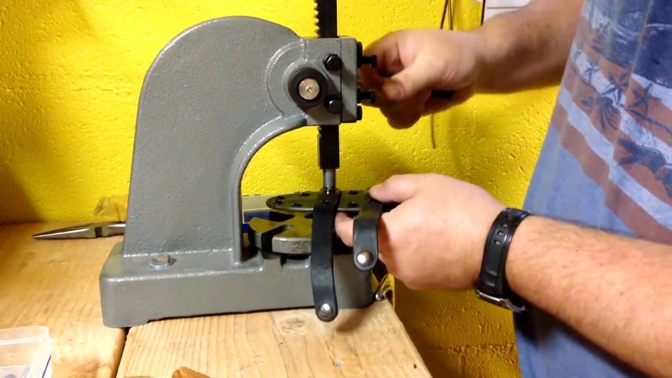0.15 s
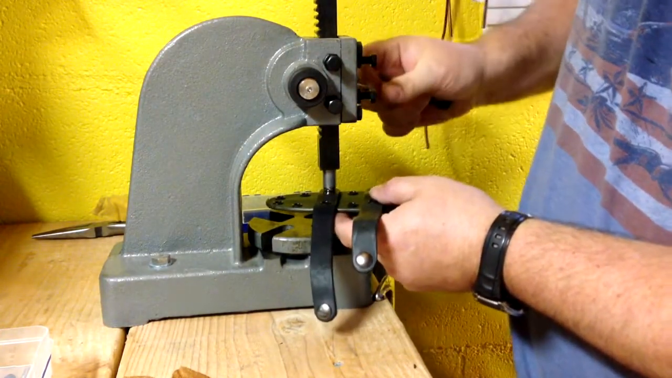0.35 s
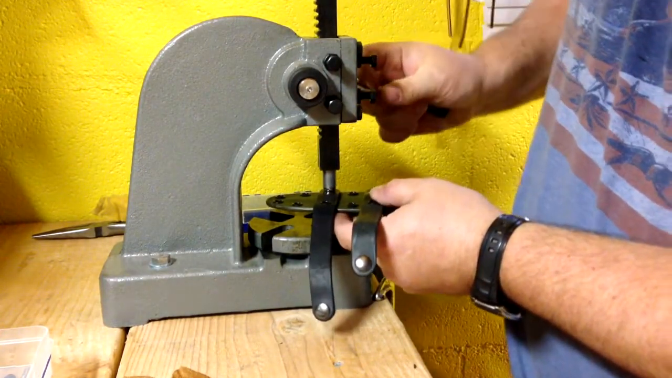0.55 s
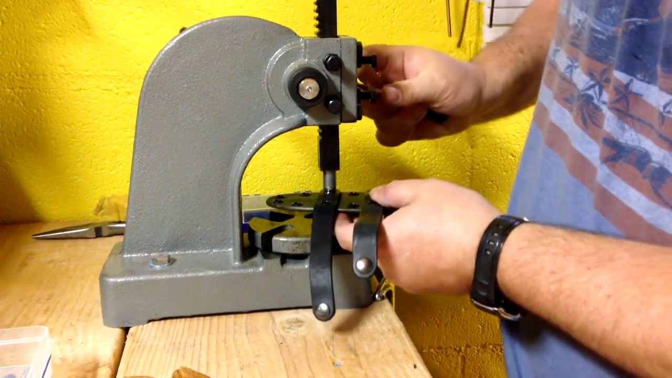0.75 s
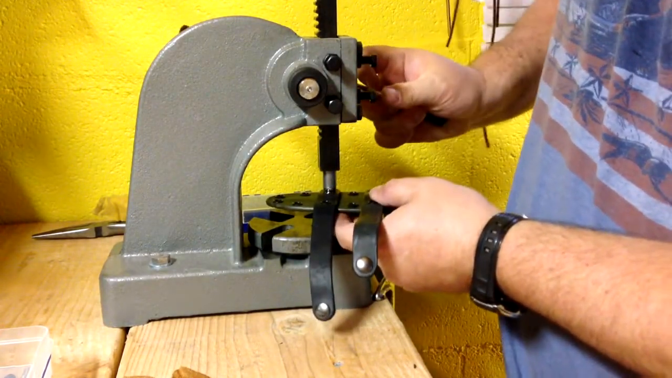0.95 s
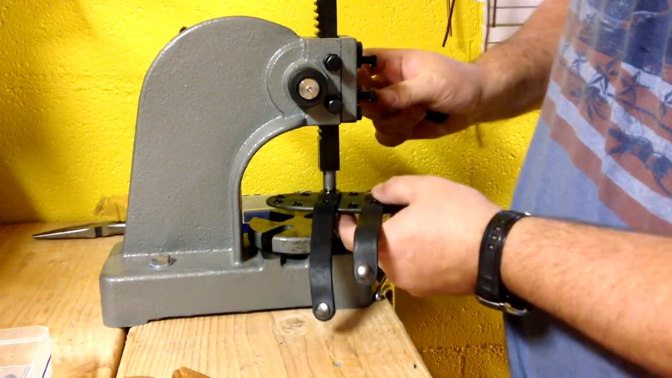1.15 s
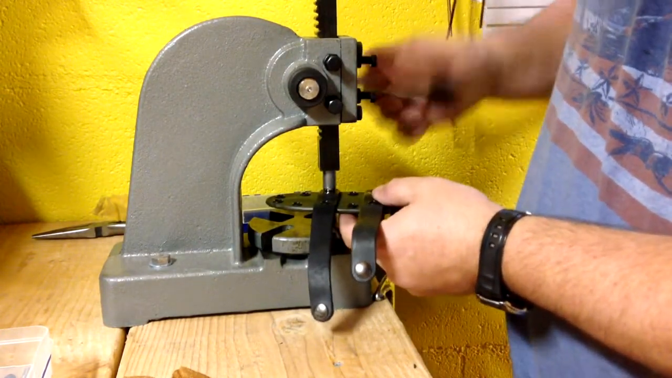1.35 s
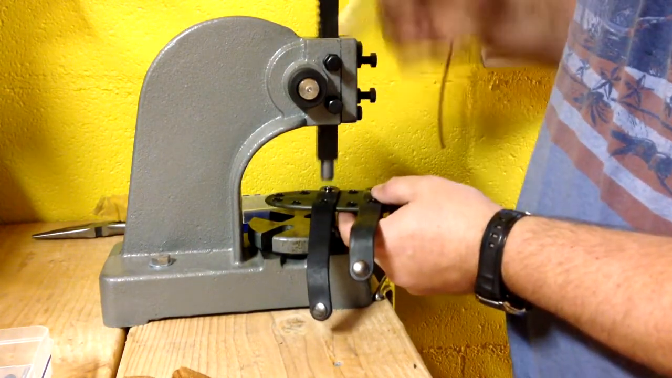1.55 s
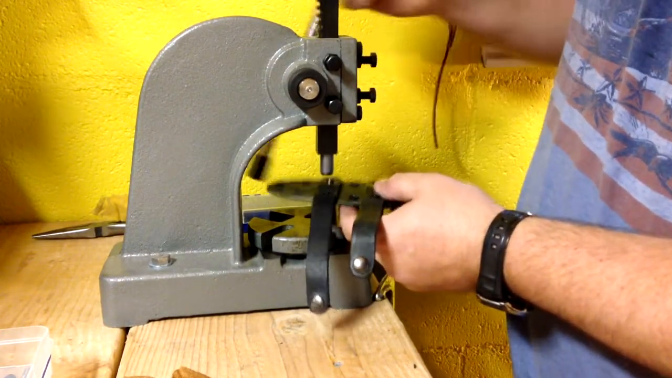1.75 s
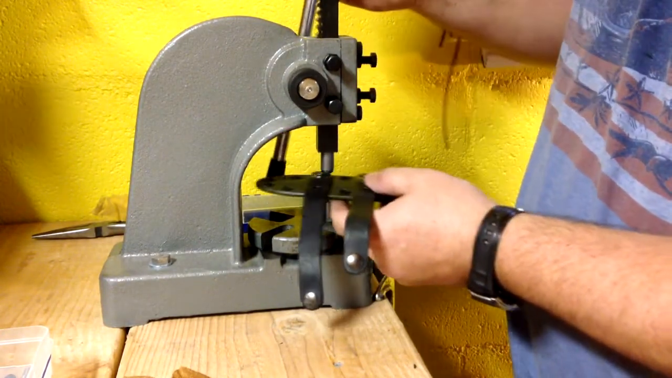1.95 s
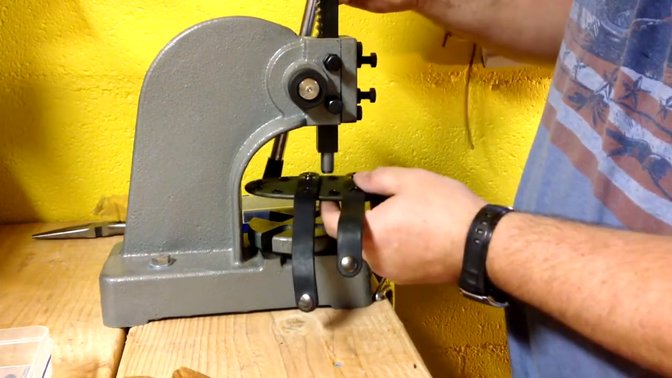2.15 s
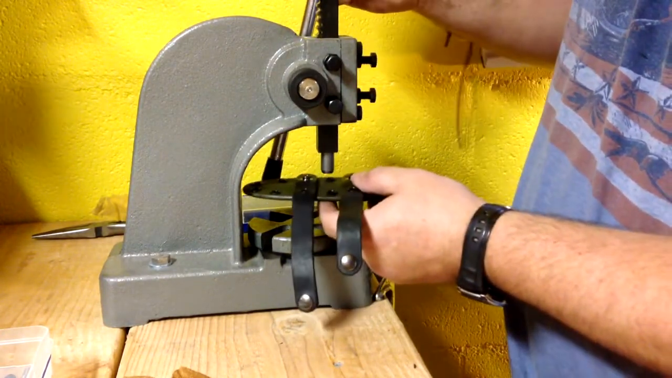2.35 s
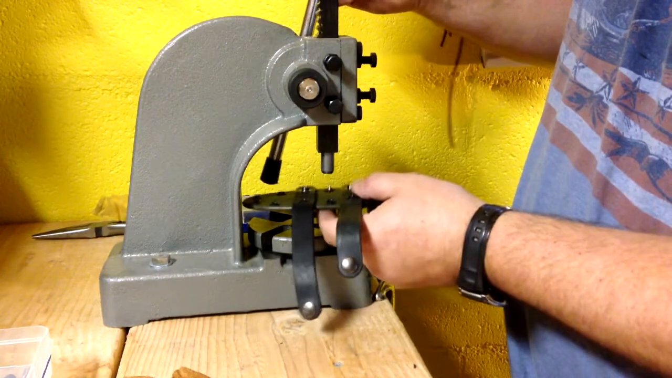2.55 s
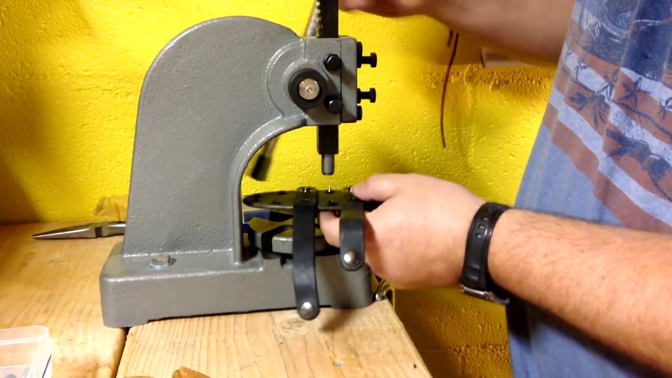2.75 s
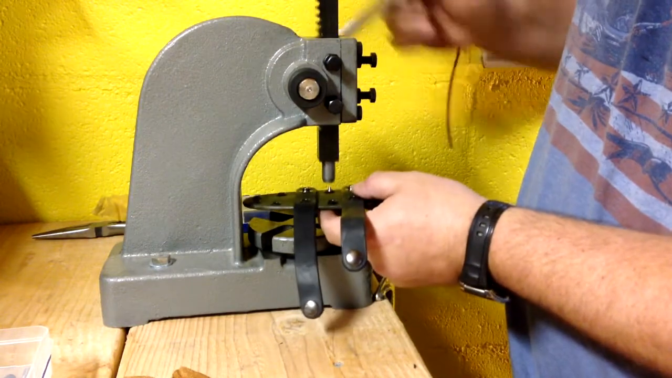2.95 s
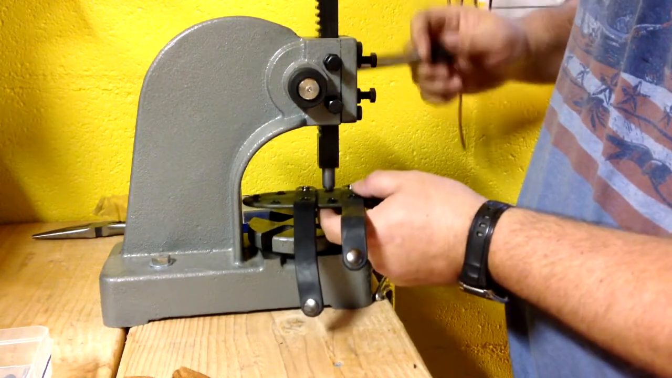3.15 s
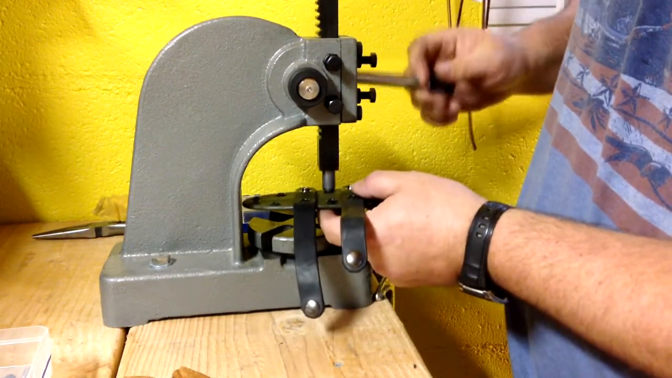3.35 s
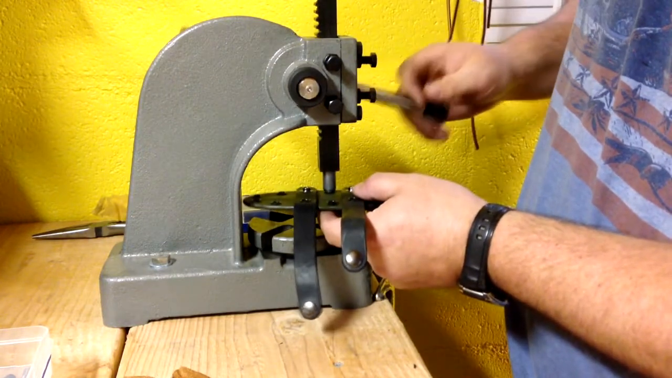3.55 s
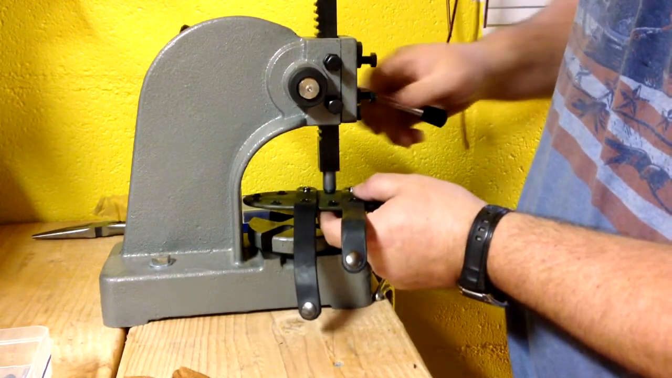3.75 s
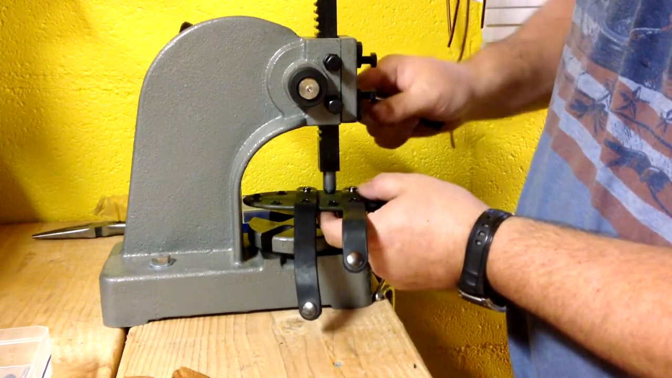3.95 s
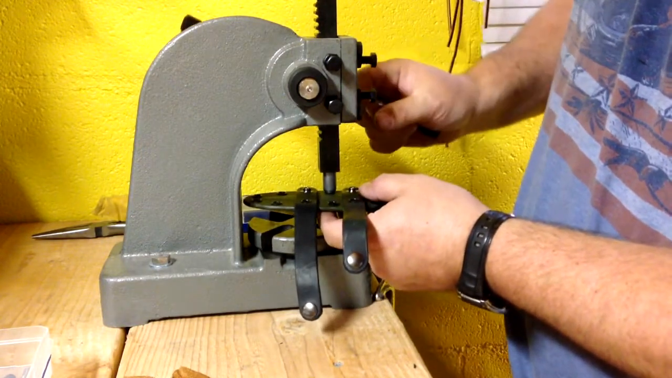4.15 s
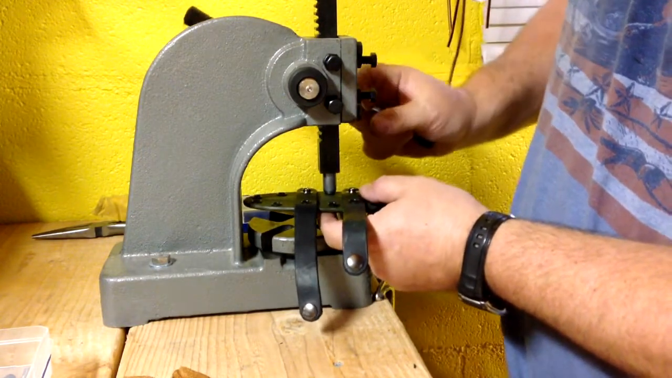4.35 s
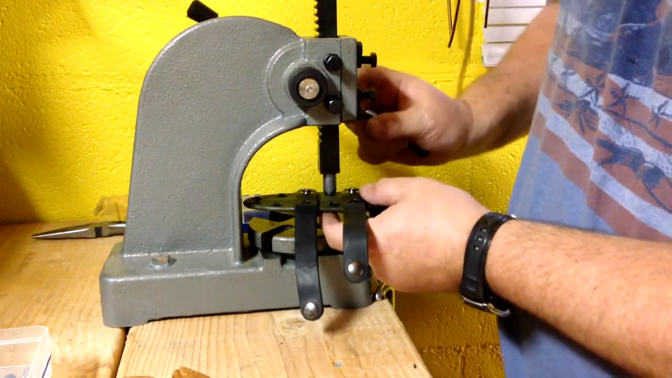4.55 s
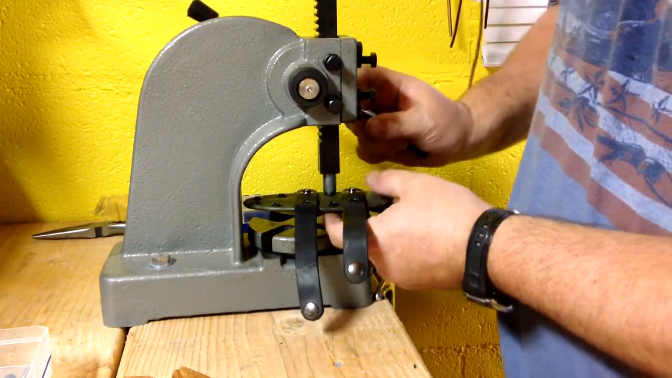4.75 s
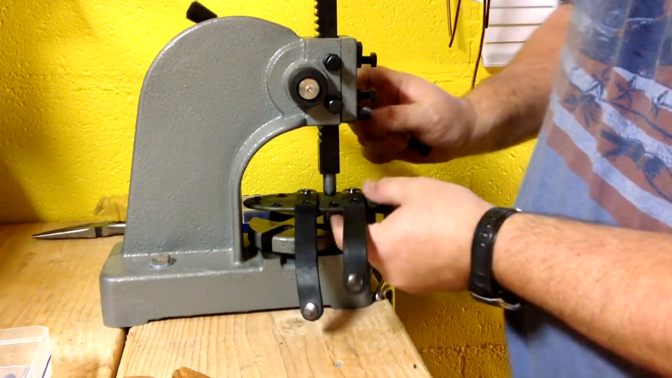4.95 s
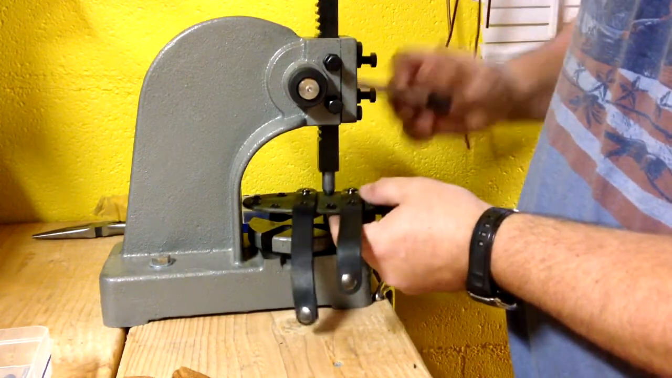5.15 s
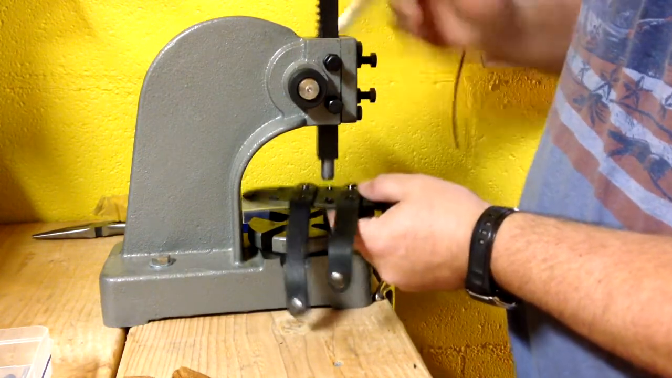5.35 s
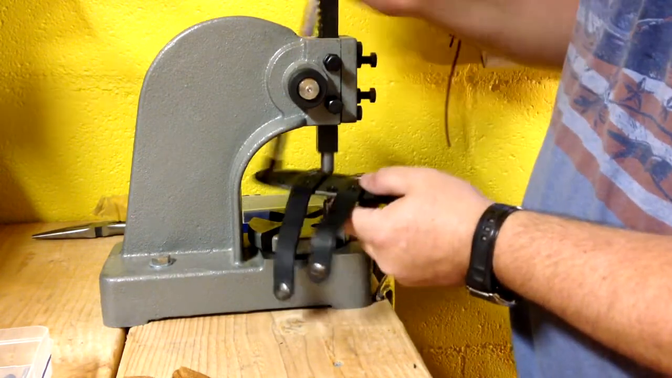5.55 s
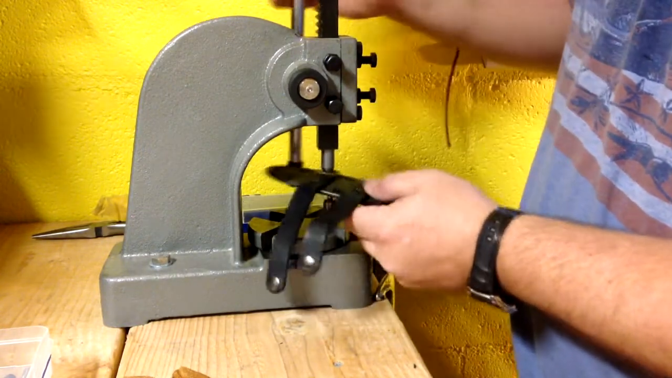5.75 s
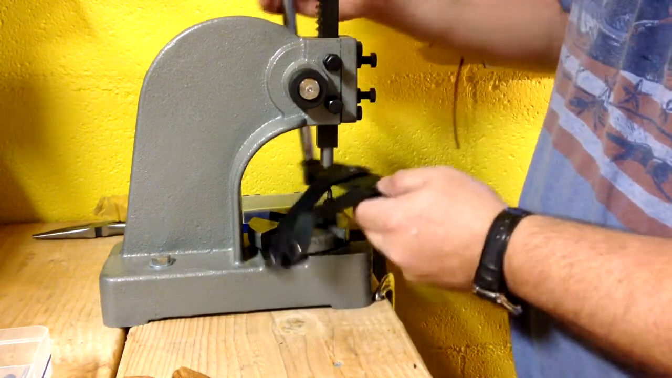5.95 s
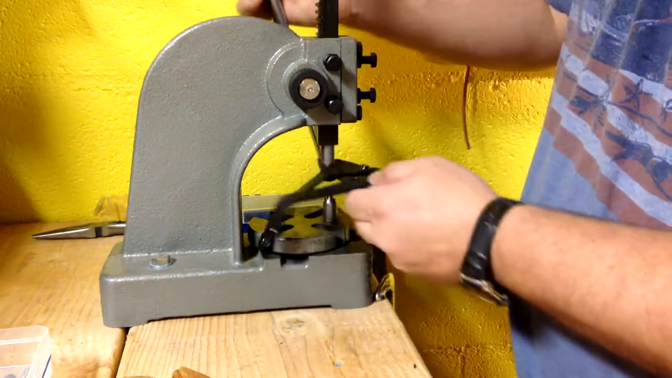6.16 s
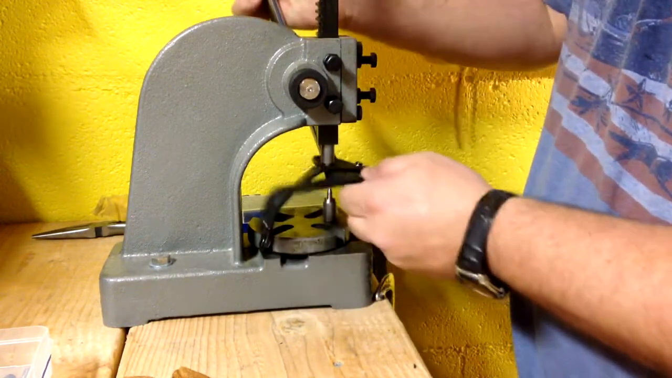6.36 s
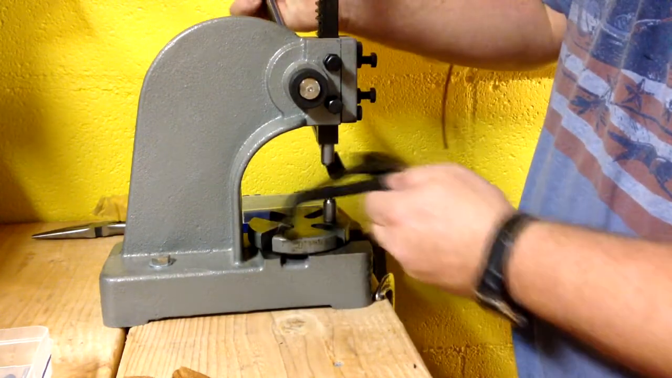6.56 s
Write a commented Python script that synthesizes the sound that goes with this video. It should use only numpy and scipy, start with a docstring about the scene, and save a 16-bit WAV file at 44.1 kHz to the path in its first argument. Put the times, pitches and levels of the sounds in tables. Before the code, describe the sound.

Close to the microphone in a quiet workshop, a metal hand press thuds through a wooden bench and its loose handle clinks in two short rattling bursts, about four seconds apart. Between them come lighter knocks, a sharp click, small scrapes and one faint squeak as a stiff sheath shifts on steel. After the second burst a rivet pulls loose with a short jerky creak, followed by a few light ticks and scrapes.

```python
"""A hand lever press on a wooden bench lets go of two rivets, close by in a quiet workshop.
Its toothed bar (the rack) and its ram knock through the cast frame into the bench, and the loose
steel handle clinks. A stiff sheath clicks, scrapes and squeaks on the die, the steel block under it,
and a rivet creaks free in jerks. Working hands make the bench murmur; the microphone hisses softly."""
import sys
import numpy as np
from scipy import signal
from scipy.fft import rfft, irfft
from scipy.io import wavfile
from scipy.ndimage import uniform_filter1d

SR = 44100
rng = np.random.default_rng(int(sys.argv[2]) if len(sys.argv) > 2 else 0)


def master_out(mix):
    """Clip the mix to full scale and print it as 16-bit PCM to the path in sys.argv[1]."""
    frames = np.transpose(np.atleast_2d(mix))
    ceiling = np.clip(frames, -1, 1)
    pcm = np.round(ceiling * 32767).astype(np.int16)
    wavfile.write(sys.argv[1], SR, pcm)


N = 291060

# Below, t is when, f is pitch, and fade is the time a sound takes to drop by 60 dB.
# A "colour" lists how strong each pitch is in a noise; "tones" are the notes a struck part rings with.
# microphone hiss: f/Hz, level/dB
HISS_COLOUR = [(15, -37), (25, -10), (70, 3.5), (153, -7), (301, -10), (335, -14), (364, -9.5), (451, -26),
               (489, -26), (659, -17), (715, -16), (841, -23.5), (3250, -15.5), (14800, -20.5),
               (16000, -53)]
# bouts of hands and rack working the bench: t/s of the strongest moment, level/dB, fall/(dB per s)
BOUTS = [(0.42, -70.5, 29), (1.32, -69, 38), (1.49, -46.5, 53), (3.0, -57, 49), (3.62, -74, 15),
         (4.37, -68.5, 41), (5.22, -44.5, 62), (5.4, -55, 44), (5.66, -56, 41), (5.989, -60, 82),
         (6.6, -66, 52)]
# bench under the hands: f/Hz, level/dB
MURMUR_COLOUR = [(50, -20), (120, 4), (300, -4), (700, -12), (1100, -20.5), (3000, -47)]
# blows: t/s, bench level/dB, favoured bench f/Hz, frame/dB and hard edge/dB (both added to the level)
BLOWS = [(0.004, -47, 186, -22, -24), (0.159, -47, 98, -35, -35), (0.2, -57.5, 150, -22, -30),
         (0.224, -64.5, 191, -27, -30), (0.35, -57, 480, -14, -22), (0.364, -47.5, 398, -15, -21.5),
         (0.389, -58.5, 422, -21, -31), (1.298, -51.5, 200, -17, -43), (1.331, -48, 416, -18, -33),
         (1.345, -32.5, 363, -9.5, -26.5), (1.427, -32, 431, 5, -13.5), (1.439, -37.5, 205, -20, -12.5),
         (1.486, -30, 301, -9, -7), (1.504, -33, 288, -11, -24), (1.519, -45, 301, -30, -20),
         (1.573, -33.5, 447, -7.5, -8), (1.602, -37, 383, 0, -15), (1.653, -41.5, 296, -0.5, -16.5),
         (1.684, -48.5, 198, -9, -18), (1.719, -40.5, 452, 2.5, -6), (1.798, -44.5, 282, -13, -34),
         (1.84, -51, 206, -23, -27), (2.821, -56.5, 277, -6, -24), (2.836, -39.5, 310, 2.5, -16),
         (3.003, -41, 280, -4, -19), (3.128, -63, 199, -16, -8), (3.182, -55, 151, -4.5, -20),
         (3.408, -60, 96.9, -26, -29), (3.456, -43.5, 193, -11.5, -32), (3.503, -47.5, 203, -41, -40),
         (3.618, -42, 296, -21, -30), (3.63, -37.5, 460, 2, -12), (3.654, -45, 194, -15, -31),
         (3.92, -48, 208, -5.5, -26), (4.175, -52, 194, -17, -31), (4.363, -46.5, 275, -12, -40),
         (4.377, -43.5, 415, -11.5, -32), (4.499, -59, 246, -26.5, -20), (5.048, -44, 215, -13.5, -45),
         (5.087, -40, 394, -8.5, -31), (5.169, -31, 198, 2.5, -9.5), (5.199, -26.5, 290, -9.5, -9),
         (5.224, -50, 468, 2, -13), (5.284, -37, 288, -2, -9), (5.298, -38.5, 288, 3, -14),
         (5.318, -31, 336, 3.5, -1.5), (5.349, -35, 450, -3, -2.5), (5.389, -35, 199, -3.5, -14.5),
         (5.492, -46, 471, 5, -8), (5.521, -40, 252, -3.5, -19), (5.627, -42.5, 433, -12, -2),
         (5.65, -38, 211, -12.5, -12), (5.698, -42.5, 435, -7, -10), (6.041, -54.5, 511, -2, -20)]
# bench top: f/Hz, level/dB, fade/s
BENCH_TONES = [(59.6, 1, 0.23), (117, 2.5, 0.11), (200.8, 1.5, 0.098), (283, -1, 0.096), (347, -3, 0.074),
               (430, -0.5, 0.087), (479, -7, 0.13)]
# cast frame: f/Hz, level/dB, fade/s
FRAME_TONES = [(556, -8.5, 0.17), (607, 1, 0.096), (706.3, 1.5, 0.12), (748.5, 0, 0.086), (813, -4, 0.065),
               (962, -3.5, 0.11), (1120, -7, 0.043), (1176, -15, 0.11)]
# rough wooden thud under each blow: f/Hz, level/dB
THUD_COLOUR = [(60, -26), (150, -11.5), (400, 1), (900, -7), (1400, -27), (4000, -59)]
# the frame's many small tones, blurred into a clatter: f/Hz, level/dB
CLATTER_COLOUR = [(700, 2.5), (1300, 8.5), (2300, 5.5), (3500, -4), (5500, -14), (9000, -26), (16000, -82)]
# how long that clatter lasts: f/Hz, fade/s
CLATTER_FADES = [(1000, 0.094), (2500, 0.16), (5000, 0.1), (9000, 0.019)]
# ram and die plate: f/Hz, level/dB, fade/s
PLATE_TONES = [(1507, 12, 0.069), (1650, -13, 0.027), (2030, -31, 0.027), (2050, -8, 0.033),
               (2227, -2, 0.075), (2330, 10, 0.048), (2653, -28.5, 0.074), (3220, -13, 0.036),
               (3930, 7, 0.014), (4700, -13, 0.042)]
# sheath and rivet snapping on the die: t/s, level/dB, centre f/Hz, rough treble/dB against the centre
SNAPS = [(1.0723, -62.5, 2700, -16), (1.767, -53, 2470, -30), (1.783, -52, 2950, -30),
         (1.8666, -32.5, 3400, -21.5), (1.9193, -54, 3700, -31), (2.837, -42, 1690, -44),
         (3.2635, -56, 2700, -22), (3.6311, -38.5, 2060, -31), (3.6905, -57.5, 2080, -5),
         (5.6285, -37, 2460, -25), (5.652, -35, 2620, -20), (5.699, -54, 3000, -32),
         (5.7932, -52.5, 2500, -40), (5.8332, -61, 2750, -3), (5.969, -48.5, 7980, -3),
         (5.978, -55, 6800, -3), (6.006, -55, 6600, -6), (6.074, -60, 7500, -3), (6.0453, -52.5, 1650, -14),
         (6.094, -53, 1630, -1), (6.106, -51.5, 6800, -16), (6.157, -60.5, 2270, -9),
         (6.4998, -60, 2280, -23), (6.573, -68, 2260, -20), (6.5882, -52.5, 3000, 0)]
# handle rattling in its hole: t/s, level/dB, boost of the upper tones/dB,
# singing/dB (added to the level), singing f/Hz (set by how far the handle has slid)
RATTLES = [(1.4591, -33, 0, -30, 4620), (1.4868, -44, 4, -16, 4620), (1.517, -58, -8, -14.0, 4600),
           (1.5743, -56.5, -5, -18, 4600), (5.188, -37.5, -6, -14.5, 4650), (5.1981, -42.5, -7, -15, 4650),
           (5.2945, -47, 11, -4, 4460), (5.3166, -51, -26, -6, 4500), (5.3502, -50, -28, -13, 4510)]
# the handle's quick tones: f/Hz, level/dB, fade/s
HANDLE_TONES = [(4000, -8, .03), (4317, -2, .03), (4700, 0, .035), (4980, -3, .03), (5276, -5, .03),
                (7550, -4, .022), (7750, -5, .025), (8100, -23, .07), (10300, -19, .02)]
# the handle's tones that sing on: multiple of the singing pitch, level/dB, fade/s
SINGING_TONES = [(1, 4, 0.31), (1.035, -7, 0.15)]
# rough crack of steel on steel: f/Hz, level/dB
CRACK_COLOUR = [(1500, 11), (3500, 0), (6000, -0.5), (8500, 1), (12000, -29), (16000, -37)]
# sheath dragged over steel: t/s, length/s, level/dB, fizz/dB and rub/dB (both added to the level)
DRAGS = [(1.757, 0.02, -59.5, -28, -10), (1.864, 0.018, -65, -12, -22), (1.923, 0.038, -67.5, -8, -15),
         (1.986, 0.032, -66.5, -12, -13), (2.545, 0.057, -71, 2.5, 5), (2.649, .025, -67, -9, -1.5),
         (3.663, 0.031, -73, 3.5, -20), (5.658, 0.026, -57.5, -9.5, -5), (5.837, 0.088, -61, -26, -1.5),
         (5.973, .012, -69.5, 10, -22), (6.074, .01, -79, 13, -20), (6.038, 0.0078, -67.5, 4, -20),
         (6.091, 0.021, -61, -1.5, -12), (6.478, .03, -65.5, -4, -9), (6.579, .03, -57, -5, -7.5)]
# the dragged sheath: f/Hz, width/Hz, level/dB
SHEATH_TONES = [(2000, 360, 4.5), (2400, 340, 6), (3024, 310, 6), (4200, 460, 0)]
# fizz of the finest slips: f/Hz, level/dB
FIZZ_COLOUR = [(2350, -26.5), (4000, -8.5), (6590, 6.5), (12600, -10), (14800, -8), (15600, 0.5),
               (16000, -48)]
# low rub in the frame: f/Hz, level/dB
RUB_COLOUR = [(200, -16), (450, 1.5), (1200, -6), (2000, -15), (16000, -70)]
# sheath catching on the die edge: t/s, length/s, level/dB
CATCH = (2.483, 0.042, -52)
# the squeaking sheath: f/Hz, width/Hz, level/dB
SQUEAK_TONES = [(1970, 330, -1.5), (3100, 430, -5.5), (4230, 870, -2.5), (5700, 940, -3), (7400, 1000, -5),
                (12000, 2500, -4)]
# the set rivet jerking free: t/s, level/dB
RIVET_JERKS = [(5.832, -49), (5.86, -53), (5.87, -49), (5.881, -41), (5.896, -41.5), (5.912, -43),
               (5.921, -44.5), (5.929, -50.5)]
# rivet and sheath together: f/Hz, level/dB, fade/s
RIVET_TONES = [(944, 8, 0.015), (1520, -4, 0.019), (2110, -4.5, 0.014), (2780, -3.5, 0.024),
               (3260, 2.5, 0.015), (5100, -10, 0.013)]
# workshop echo: f/Hz, fade/s
ROOM_FADES = [(100, 0.52), (500, 0.2), (2000, 0.34), (8000, 0.14)]


def amp(db):
    """Turns decibels into a factor to multiply by."""
    return 10 ** (np.asarray(db) / 20)


def evened(x):
    """Scales x to an average power of 1."""
    return x / np.sqrt(np.mean(x ** 2) + 1e-20)


def look_up(points, hz):
    """Reads between the rows of a table of pitches."""
    f, value = np.transpose(points)
    return np.interp(np.log(hz + 1), np.log(f + 1), value)


def add(mix, s, db, sound):
    """Places a sound at s seconds, with its strongest 3 ms at the level db."""
    top = np.sqrt(uniform_filter1d(sound ** 2, size=130).max())
    part = mix[max(round(s * SR), 0):][:len(sound)]
    part += amp(db) / top * sound[:len(part)]


def coloured(x, colour):
    """Makes each pitch in x as strong as the colour says."""
    gain = amp(look_up(colour, np.fft.rfftfreq(len(x), 1 / SR)))
    return evened(irfft(rfft(x) * gain, len(x)))


def noise(samples, colour):
    """Random noise with the given colour."""
    return coloured(rng.standard_normal(samples), colour)


def dying(x, fades):
    """Each pitch in x fades at its own speed, given as (f/Hz, fade/s)."""
    hz, t, bands = signal.stft(x, SR, nperseg=256)
    gain = amp(-60 * t / look_up(fades, hz)[:, None])
    return signal.istft(bands * gain, SR, nperseg=256)[1][:len(x)]


def rising(x, ms):
    """Softens the start: x builds up over about ms milliseconds."""
    return x * (1 - np.exp(-np.arange(len(x)) * 1000 / SR / max(ms, .02)))


def ring(tones, spread_db, detune, damping=1, boost_db=lambda f: 0):
    """Three close, fading waves to a tone; where the blow lands changes their sizes and signs."""
    hz, db, fade_s = np.transpose(np.repeat(tones, 3, axis=0))[:, :, None]
    chance = rng.standard_normal((3, len(hz), 1))
    t = np.arange(0, min(.7 * fade_s.max() / damping, .2), 1 / SR, dtype=np.float32)
    size = amp(db + boost_db(hz) + spread_db * chance[0]) * np.sign(chance[1])
    fade = np.exp(np.float32(-np.log(1000) * damping / fade_s) * t)
    waves = fade * np.sin(np.float32(2 * np.pi * hz * (1 + detune * chance[2])) * t)
    soft_end = np.minimum(4 - 4 * t / t[-1], 1)
    return (size[:, 0] @ waves) * soft_end


def grit(per_s, spread_db):
    """Tiny slips or bumps of uneven size, at random moments."""
    sizes = amp(spread_db * np.minimum(rng.exponential(1, N), 4))
    return sizes * (rng.random(N) < per_s / SR) * rng.choice([-1, 1], N)


def rubbed(slips, tones):
    """Every slip sets the tones ringing; wider tones die sooner."""
    t = np.arange(1000) / SR
    body = sum(amp(db) * np.exp(-np.pi * width * t) * np.sin(2 * np.pi * hz * t)
               for hz, width, db in tones)
    return evened(signal.oaconvolve(slips, rising(body, 0.27))[:N])


def stroke(start, length, db, rise, fall):
    """Loudness that climbs to db at start, holds for length and drops; rise and fall are in dB per s."""
    t = np.arange(N) / SR - start
    return amp(db - rise * np.maximum(-t, 0) - fall * np.maximum(t - length, 0))


def microphone_hiss():
    """The microphone's own steady, faint noise."""
    return amp(-68) * noise(N, HISS_COLOUR)


def bench_murmur():
    """Small random bumps keep the bench murmuring, louder while the hands work."""
    bump = rising(dying(noise(8192, MURMUR_COLOUR), [(100, 0.074), (800, 0.11)]), ms=1.9)
    at_rest = amp(-78)
    effort = at_rest + sum(stroke(s, 0, db, rise=153, fall=fall) for s, db, fall in BOUTS)
    return effort * evened(signal.oaconvolve(grit(per_s=300, spread_db=4), bump)[:N])


def press_knocks():
    """Each blow rings bench and frame and thuds; a harder edge brings more clatter and plate ring."""
    out = np.zeros(N)
    for s, db, hz, frame_db, edge_db in BLOWS:
        rise_ms = 1.06 - 0.02 * edge_db  # the softer the edge, the slower the blow builds
        # More damping makes the ringing die sooner. Three things add to it:
        seating = 0.01 * (db + 44.5)  # strong blows press the parts together
        into_frame = 0.04 * (frame_db + 13)  # blows that go mostly into the frame are drier
        palm = 1.5 * max(np.log2(190 / hz), 0)  # the deepest bumps are a palm, which stills the bench
        damping = max(1 + seating + into_frame + palm, .3)
        bench = ring(BENCH_TONES, spread_db=0.98, detune=0.034, damping=damping,
                     boost_db=lambda f: -7.5 * abs(np.log2(f / hz)))
        add(out, s, db, rising(bench, rise_ms))
        frame = ring(FRAME_TONES, spread_db=0.72, detune=0.026, damping=damping)
        add(out, s, db + frame_db, rising(frame, rise_ms))
        thud = dying(noise(8192, THUD_COLOUR), [(200, 0.28), (900, 0.17)])
        add(out, s, db - 13.5, rising(thud, 0.64 * rise_ms))
        clatter = dying(noise(8192, CLATTER_COLOUR), np.divide(CLATTER_FADES, [1, damping]))
        add(out, s, db + edge_db, rising(clatter, 0.097 * rise_ms))
        plate = ring(PLATE_TONES, spread_db=4.5, detune=0.016)
        add(out, s, db + edge_db - 4, rising(plate, 0.95 * rise_ms))
    return out


def sheath_clicks():
    """Sheath and rivet snap on the die: a quick burst of noise that leaves the plate ringing faintly."""
    out, t = np.zeros(N), np.arange(4096) / SR
    for s, db, hz, treble_db in SNAPS:
        fade_s = 0.043 * np.exp(-0.022 * (db + 55))  # louder snaps die sooner
        colour = [(hz / 8, -30), (hz / 2.55, -5), (hz, 0), (hz * 1.29, -2),
                  (11000, 1.05 * treble_db), (16000, 2 * treble_db - 1)]
        snap = noise(len(t), colour) * amp(-60 * t / fade_s)
        add(out, s, db, rising(snap, ms=0.042))
        plate = ring(PLATE_TONES, spread_db=9, detune=0.0099,
                     boost_db=lambda f: -8.5 * abs(np.log2(f / hz)))
        add(out, s, db - 24.5, plate)
    return out


def chatter(ms):
    """Parts do not meet cleanly: a first touch, then a short dying shudder."""
    t = np.arange(SR // 20) / SR
    force = 0.25 * rng.standard_normal(len(t)) * np.exp(-t * 1000 / ms)
    force[0] = 1
    return force


def handle_clinks():
    """Steel hits steel: quick bright tones, a wavering note that sings on, and a rough crack."""
    out = np.zeros(N)
    for s, db, upper_db, sing_db, sing_hz in RATTLES:
        bright = ring(HANDLE_TONES, spread_db=-5.5, detune=0.019,
                      boost_db=lambda f: upper_db * (f > 6500))
        add(out, s, db, signal.fftconvolve(chatter(ms=1), bright))
        song = ring(np.multiply(SINGING_TONES, [sing_hz, 1, 1]), spread_db=3.5, detune=0.006)
        # the loose handle touches and lets go, so the note flutters
        flutter_db = 4.5 * evened(uniform_filter1d(rng.standard_normal(len(song)), size=500))
        add(out, s, db + sing_db, song * amp(flutter_db))
        crack = dying(noise(4096, CRACK_COLOUR), [(3000, 0.16), (10000, 0.058)])
        add(out, s, db - 9.5, crack)
    return out


def sheath_scrapes():
    """Many tiny slips ring the sheath; finer ones fizz above, coarser ones rub in the frame."""
    rasp = rubbed(grit(per_s=1500, spread_db=-0.5), SHEATH_TONES)
    fizz = coloured(grit(per_s=2200, spread_db=4.5), FIZZ_COLOUR)
    rub = coloured(grit(per_s=700, spread_db=1.5), RUB_COLOUR)
    out = np.zeros(N)
    for s, length, db, fizz_db, rub_db in DRAGS:
        scrape = rasp + amp(fizz_db) * fizz + amp(rub_db) * rub
        out += stroke(s, length, db, rise=1500, fall=417) * scrape
    return out


def sheath_squeak():
    """The sheath catches on the die edge, and a rush of slips makes it squeak once."""
    squeak = rubbed(grit(per_s=2400, spread_db=1.5), SQUEAK_TONES)
    return stroke(*CATCH, rise=6000, fall=2500) * squeak


def rivet_creak():
    """The rivet comes free in jerks, each a short dull ring of rivet and sheath."""
    out = np.zeros(N)
    for s, db in RIVET_JERKS:
        jerk = ring(RIVET_TONES, spread_db=3, detune=0.04)
        add(out, s, db, rising(jerk, ms=0.08))
    return out


def room_echo(x):
    """The workshop sends back many scattered echoes; the highest pitches die first."""
    echoes = np.zeros(SR // 2)
    at = np.arange(200, len(echoes) - 20, 20)
    echoes[at + rng.integers(0, 20, len(at))] = rng.choice([-1., 1.], len(at))
    tail = dying(echoes, ROOM_FADES)
    return signal.fftconvolve(x, tail / np.linalg.norm(tail))[:N]


def scene():
    """Mixes the press, its echo, the murmur and the hiss into one channel."""
    press = press_knocks() + handle_clinks() + sheath_clicks() + rivet_creak()
    press += sheath_scrapes() + sheath_squeak()
    workshop = press + amp(-13) * room_echo(press) + bench_murmur()
    # the microphone lets through little deep bass below about 70 Hz
    heard = signal.lfilter(*signal.butter(2, 70, "high", fs=SR), workshop)
    return (heard + microphone_hiss())[None]


def record(dry):
    """The recorder cuts off the very highest pitches."""
    top_hz = 15750
    treble_cut = signal.firwin(511, top_hz, window=("kaiser", 9), fs=SR)
    return signal.oaconvolve(dry, treble_cut[None], "same")


dry = scene()
out = record(dry)
master_out(out)
```